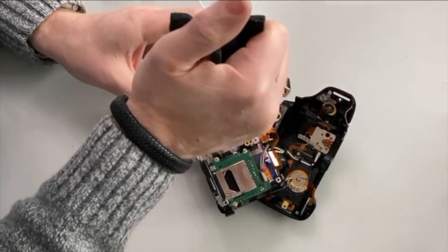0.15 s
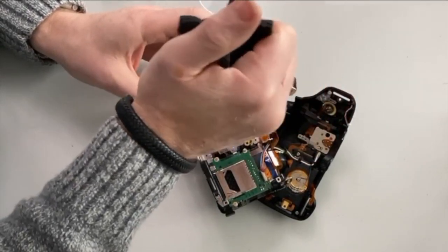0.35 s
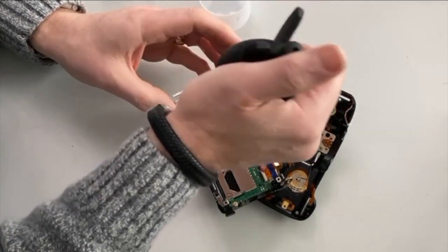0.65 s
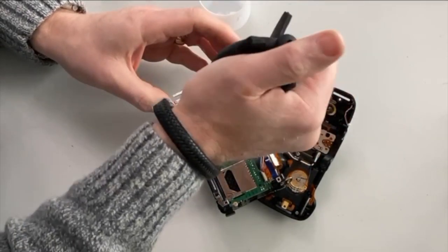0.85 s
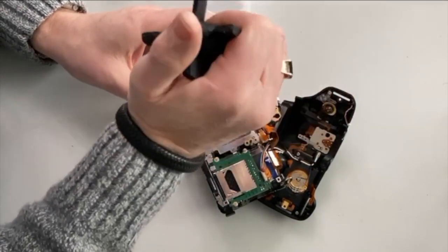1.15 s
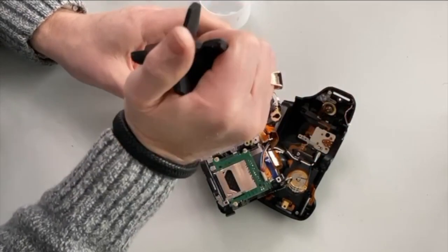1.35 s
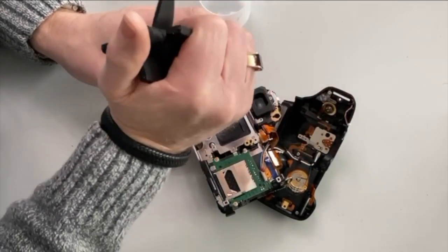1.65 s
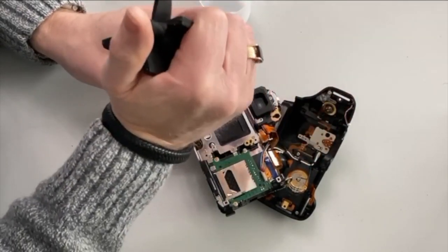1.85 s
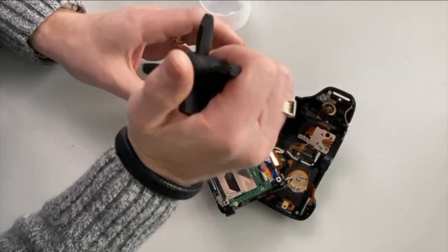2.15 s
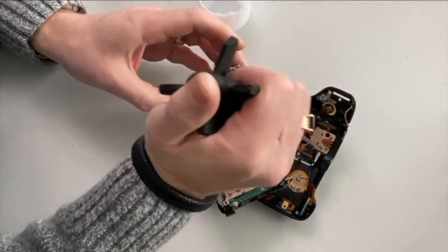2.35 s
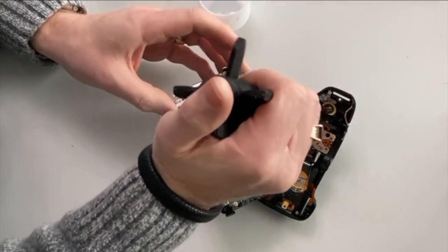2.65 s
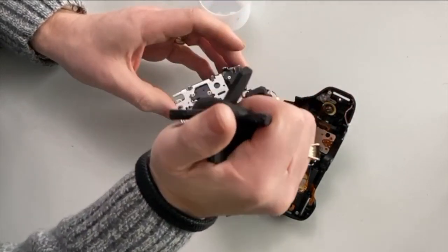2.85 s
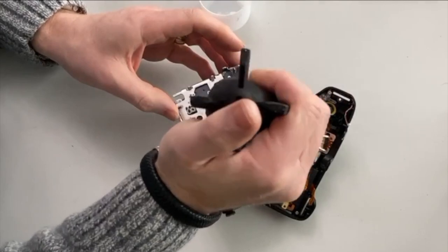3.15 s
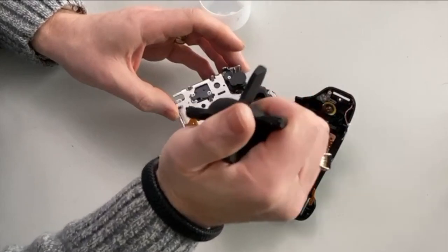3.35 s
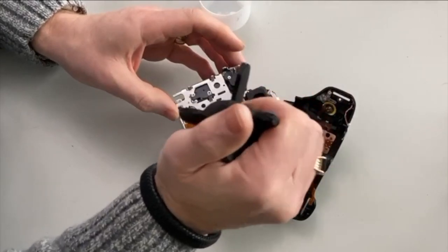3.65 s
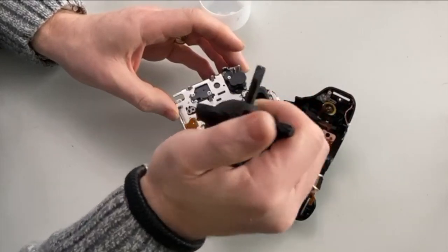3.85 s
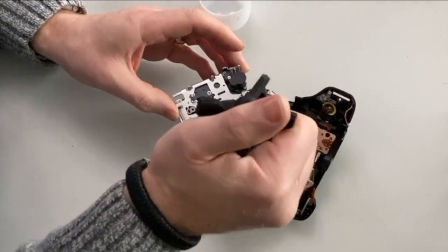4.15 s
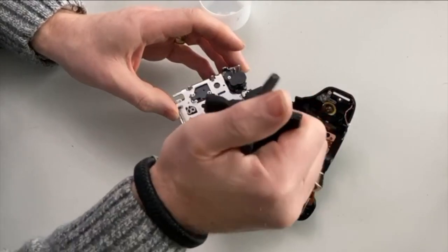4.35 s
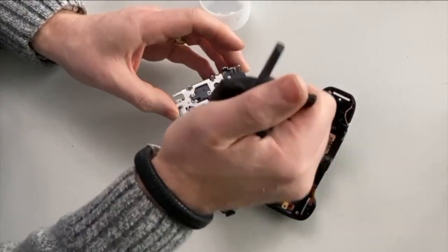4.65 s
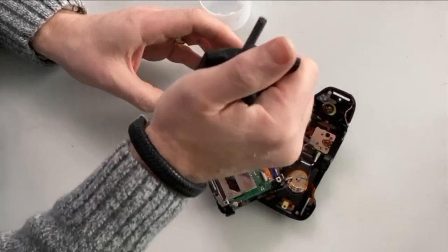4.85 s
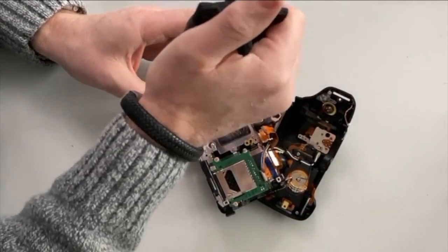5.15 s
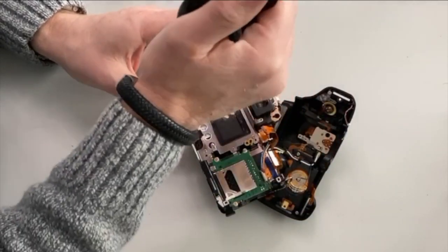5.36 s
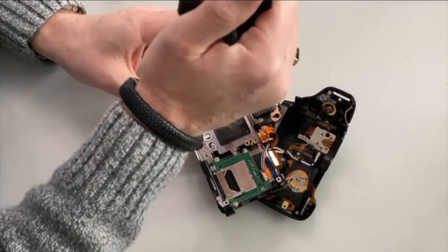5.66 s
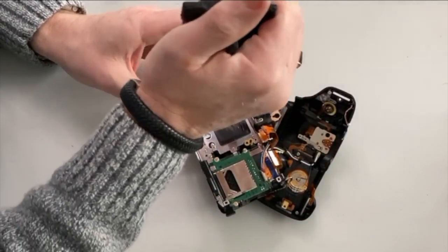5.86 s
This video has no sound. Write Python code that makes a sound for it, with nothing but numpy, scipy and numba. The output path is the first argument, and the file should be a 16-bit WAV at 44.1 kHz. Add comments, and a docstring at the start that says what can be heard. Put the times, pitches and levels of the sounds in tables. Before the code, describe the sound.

Close to one microphone in a small quiet room, a hand pumps a rubber bulb blower over a dismantled camera about four times a second. Each squeeze gives a short bright hiss; each release follows at once with a thinner intake and tiny high chirps. A ringing tap comes near the first second, soft thuds around four, light clicks after.

```python
"""On a desk in a small quiet room, a hand pumps a rubber bulb blower about four times a second.
Each squeeze sends a hissing jet onto small electronics: noise in resonances of their hollows and edges.
Each release draws air back through the rear valve: thinner noise, with gliding tones for its whistles.
Taps and dull thuds are fading tones; rumble and faint hiss lie below. One microphone listens close by."""
import sys
import numpy as np
from scipy import signal
from scipy.io import wavfile
from scipy.ndimage import uniform_filter1d
from numba import njit

SR = 44100
rng = np.random.default_rng(int(sys.argv[2]) if len(sys.argv) > 2 else 0)


def put_to_file(sound):
    """Save the sound as 16-bit audio at rate SR, in the file named by the first command-line argument."""
    columns = np.atleast_2d(sound).T  # one column per channel
    safe = np.clip(columns, -1, 1)
    whole_steps = np.round(safe * 32767)
    wavfile.write(sys.argv[1], SR, whole_steps.astype(np.int16))


N = 264159  # length in samples
SILENT_DB = -55.5  # level at which a squeeze or release starts and ends


def undb(db):
    """Turn a level in dB into a gain."""
    return 10 ** (np.asarray(db) / 20)


def unit(x):
    """Scale to an average (rms) level of 1."""
    return x / np.sqrt(np.mean(x ** 2))


@njit
def resonance(x, hz, width, bend):
    """Let through the tones near hz, with gain 1 at the centre; bend moves the centre sample by sample."""
    y, band, low = np.empty(len(x)), 0., 0.
    g0, k = np.tan(np.pi * hz / SR), width / hz
    for i in range(len(x)):
        g = g0 * bend[i]
        v = (band + g * (x[i] - low)) / (1 + g * (g + k))
        band = 2 * v - band
        low += 2 * g * v
        y[i] = k * v
    return y


def walk(rate_hz):
    """Random curve that slides to a new value rate_hz times a second; rms 1."""
    hold = int(SR / rate_hz)
    steps = np.repeat(rng.standard_normal(N // hold + 1), hold)
    return unit(uniform_filter1d(steps, hold)[:N])


def turbulence(modes, gust_db, pitch, wander=0.017, patchy_db=0.):
    """Noise in resonances whose pitches wander and whose levels flutter on top of a shared gust."""
    out = 0
    for hz, width, db in modes:
        bend = pitch * (1 + wander * walk(30))
        band = rng.standard_normal(N)
        for _ in range(2):  # two passes steepen the sides; 1.61 makes up for the narrowing
            band = resonance(band, 1. * hz, 1.61 * width, bend)
        flutter_db = 1.65 * walk(60) + patchy_db * walk(14)
        out = out + undb(db + flutter_db) * unit(band)
    return unit(out * undb(gust_db))


def stroke(start_s, full_ms, full_db, ease_ms, ease_db, length_ms, onset_ms, fall_curve, dip_db=0.):
    """One hand movement: its samples, progress 0-1 and gain, which rises, holds (maybe dips) and falls."""
    span = np.arange(max(int(start_s * SR), 0), min(int((start_s + length_ms / 1000) * SR), N))
    ms = 1000 * (span / SR - start_s)

    def ramp(a, b):
        return np.clip((ms - a) / max(b - a, 1), 0, 1)

    hold = ramp(full_ms, ease_ms)
    db = full_db + (ease_db - full_db) * hold + dip_db * np.sin(np.pi * hold) ** 2
    # a rise longer than onset_ms starts as steeply as one of that length
    db += (SILENT_DB - full_db) * (1 - ramp(0, full_ms)) ** max(full_ms / onset_ms, 1)
    # fall_curve 1 is straight in dB; more falls later
    db += (SILENT_DB - ease_db) * ramp(ease_ms, length_ms) ** fall_curve
    return span, np.clip(ms / length_ms, 0, 1), undb(db)


# Faint background hiss, strength along the pitch scale: pitch_hz [Hz], relative level_db [dB per Hz]
HISS_SPECTRUM = [(20, -1), (70, -12), (150, -10), (400, -16), (600, -11), (900, -15.5), (2000, -17),
                 (4000, -17.5), (8000, -13), (14000, -23.5)]
# Building rumble, played 3 % lower: pitch_hz [Hz], width_hz [Hz], relative level_db [dB]
RUMBLE_MODES = [(30.2, 9.1, 2.5), (47.5, 15.7, 2.5)]
HISS_DB, RUMBLE_DB = -53, -60.5


def floor():
    """Building rumble and faint hiss: noise in bands that waver slowly."""
    hz, db = np.transpose(HISS_SPECTRUM)
    centres = 20 * 2 ** np.arange(1.4, 9.6, .6)
    # a wider band holds more power
    levels = np.interp(np.log(centres), np.log(hz), db) + 10 * np.log10(centres)
    hiss = turbulence(zip(centres, centres / 3, levels), walk(3.1), pitch=0.97)
    rumble = turbulence(RUMBLE_MODES, walk(6.1), pitch=0.97)
    return undb(HISS_DB) * hiss + undb(RUMBLE_DB) * rumble


@njit
def walls(x, lags, gain, damp):
    """Room echo: eight delay lines that feed each other, duller on every round."""
    line, soft, out = np.zeros((8, 4096)), np.zeros(8), np.zeros(len(x))
    for i in range(len(x)):
        total = 0.
        for k in range(8):
            soft[k] += (1 - damp) * (gain[k] * line[k, (i - lags[k]) & 4095] - soft[k])
            total += soft[k]
        out[i] = soft[0] - soft[3] + soft[5] - soft[6]
        for k in range(8):
            line[k, i & 4095] = x[i] + soft[k] - total / 4
    return out


def room_answer(near):
    """Echoes of the near sounds; the low tones fade by 60 dB in 0.47 s and the treble sooner."""
    lags = np.array([467, 613, 797, 1013, 1231, 1493, 1759, 2039])  # samples
    gain = undb(-60 * lags / SR / 0.47)
    return undb(-16.5) * walls(near, lags, gain, 0.38)


def hits(events, modes, push_s):
    """Tones that fade after each blow; a softer contact pushes longer, so they set in more gently."""
    out, s = np.zeros(N + SR), np.arange(SR // 5) / SR
    ring = 0
    for hz, db, fade_s in modes:  # fade_s is the time to drop by 60 dB
        ring = ring + undb(db) * np.sin(2 * np.pi * hz * s) * np.exp(-np.log(1000) * s / fade_s)
    ring = ring * (1 - np.exp(-s / push_s))
    for start_s, peak_db in events:
        at = int(start_s * SR)
        out[at:at + len(s)] += undb(peak_db) * ring / np.max(ring)
    return out[:N]


# Dull thuds of hand and rubber: start_s [s], peak_db [dB]
THUDS = [(.105, -40), (3.02, -46.5), (4.201, -38), (4.229, -50), (4.328, -45), (4.478, -36.5)]
# Tones of a thud: pitch_hz [Hz], relative level_db [dB], fade_s [s for 60 dB]
THUD_MODES = [(144, 0, 0.049), (200, -2, 0.054)]


def thuds():
    """Hand and rubber knock softly: low tones that die quickly."""
    return hits(THUDS, THUD_MODES, 0.0011)


# The nozzle taps a part: start_s [s], ring_peak_db [dB], tick_peak_db [dB]
NOZZLE_TAPS = [(.916, -17, -29), (4.912, -36, -23), (5.588, -28.5, -23.5)]
# Ringing tones of a tap: pitch_hz [Hz], relative level_db [dB], fade_s [s for 60 dB]
RING_MODES = [(840, -17.5, 0.057), (2026, 2, 0.021), (2590, -1, 0.065)]
# Short tick of a tap: pitch_hz [Hz], relative level_db [dB], fade_s [s for 60 dB]
SHORT_TICK_MODES = [(925, -7.5, 0.0064), (1910, -1, 0.0054), (3650, 1, 0.0063), (5400, 5, 0.0039)]


def taps():
    """The nozzle touches a part: a hard, very short tick and a longer ring."""
    rings = [(start_s, ring_db) for start_s, ring_db, _ in NOZZLE_TAPS]
    ticks = [(start_s, tick_db) for start_s, _, tick_db in NOZZLE_TAPS]
    return hits(rings, RING_MODES, 0.0017) + hits(ticks, SHORT_TICK_MODES, 0.00017)


# Releases, when the bulb refills: start_s [s], full_ms [ms], full_db [dB],
# ease_ms (valve begins to shut) [ms], ease_db [dB], length_ms [ms],
# opening_whistle_db, closing_whistle_db, high_whistle_db [dB; about -60 is practically none]
RELEASES = [(0.026, 78, -30, 82, -34, 110, -60, -60, -60), (0.241, 63, -30.5, 86, -34.5, 98, -60, -60, -60),
            (0.487, 65, -32, 87, -32.5, 120, -39, -33.5, -60),
            (0.733, 72, -31, 88, -28.5, 126, -60, -60, -60),
            (1.033, 32, -30.5, 82, -30, 115, -60, -60, -39), (1.3, 35, -32, 71, -31.5, 100, -27, -38, -35),
            (1.548, 25, -37, 52, -34.5, 85, -39, -39, -60),
            (1.754, 48, -33.5, 79, -35, 86, -26.5, -34, -60), (2.032, 39, -33, 66, -28, 105, -31, -60, -39),
            (2.288, 60, -31, 80, -33.5, 113, -32.5, -33, -31.5),
            (2.528, 74, -33.5, 86, -34, 104, -33, -25, -60),
            (2.802, 26, -32.5, 71, -30.5, 108, -60, -32.5, -60),
            (3.022, 56, -29.5, 84, -36, 103, -33, -38, -60),
            (3.252, 42, -29.5, 64, -32.5, 95, -61, -60, -60),
            (3.468, 31, -30.5, 80, -31.5, 120, -60, -60, -34), (3.699, 40, -31, 75, -34, 85, -29, -35, -60),
            (3.918, 49, -30.5, 68, -33, 90, -60, -60, -60), (4.117, 55, -30, 86, -34.5, 112, -60, -60, -60),
            (4.344, 48, -30, 62.5, -35, 79, -60, -28.5, -60),
            (4.536, 42, -28.5, 76, -30, 97, -60, -60, -60), (4.777, 48, -31.5, 60, -30, 97, -60, -60, -60),
            (4.991, 63, -31.5, 77, -35, 97, -40, -36, -39),
            (5.242, 69, -32, 82, -29.5, 106, -32.5, -35, -39),
            (5.466, 35, -33.5, 65, -30.5, 99, -28, -60, -35.5),
            (5.686, 43, -32, 64, -33, 88, -38, -60, -60), (5.885, 43, -31, 67, -32, 96, -60, -60, -60)]
# Valve chamber, pitches bent by the inflow: pitch_hz [Hz], width_hz [Hz], relative level_db [dB]
CHAMBER_MODES = [(7585, 290, -1.5), (7740, 660, -1.5), (8370, 350, -0.13)]
# Air path of the valve, bent likewise: pitch_hz [Hz], width_hz [Hz], relative level_db [dB]
PATH_MODES = [(1486, 500, -13), (2030, 330, -13), (2550, 320, -14.5), (3600, 610, -9), (5820, 840, -3),
              (6100, 380, -1.5), (6810, 750, -2), (9200, 130, -3), (9770, 2500, -1), (11470, 110, -7),
              (11230, 3000, -10.5), (13780, 4000, -4.5)]
CHAMBER_DB, WALL_DB = -3.5, -24.5  # chamber and rubber wall beside the inflow hiss


def refill():
    """Air rushes in through the valve while the rubber wall flutters back into shape."""
    strokes = [stroke(*row[:6], onset_ms=19.2, fall_curve=1.03) for row in RELEASES]
    bend = np.ones(N)
    for span, progress, _ in strokes:  # faster inflow lifts the valve resonances a little
        bend[span] = 1 + 0.036 * (np.sin(np.pi * progress) - .7)
    gust_db = walk(200)
    chamber = turbulence(CHAMBER_MODES, gust_db, bend, wander=0.026)
    path = turbulence(PATH_MODES, gust_db, bend, wander=0.0037, patchy_db=0.5)
    # pitch Hz, width Hz, dB; played 3 % lower
    wall = turbulence([(162, 83, -3.5), (320, 600, 0.0)], 0.97 * walk(40), pitch=0.97)
    share = undb(CHAMBER_DB)
    hiss = share * chamber + np.sqrt(1 - share ** 2) * path
    out = np.zeros(N)
    for row, (span, progress, gain) in zip(RELEASES, strokes):
        out[span] += gain * hiss[span]
        out[span] += undb(row[2] + WALL_DB) * np.sin(np.pi * progress ** 1.55) * wall[span]
    return out


# Timed chirps of the refill, mostly near 7-8.7 kHz:
# start_s [s], length_ms [ms], start_pitch_hz [Hz], end_pitch_hz [Hz], level_db [dB]
TIMED_CHIRPS = [(0.067, 41, 7630, 8060, -36), (0.278, 17, 8200, 8700, -26), (0.283, 54, 7560, 7650, -33),
                (0.521, 21, 7540, 7910, -35), (0.554, 13, 8700, 8400, -32.7), (0.786, 13, 7820, 8150, -34),
                (1.064, 17, 7350, 7770, -35), (1.348, 19, 7840, 7650, -32), (2.079, 22, 8000, 7760, -32),
                (2.341, 35, 7900, 7630, -30.5), (2.565, 26, 8140, 8350, -33.6),
                (2.832, 15, 8000, 8330, -31.4), (2.841, 24, 7460, 8000, -24.5),
                (3.066, 52, 7880, 7740, -26.5), (3.298, 25, 7530, 7450, -31.5),
                (3.493, 14, 8200, 8200, -31.8), (3.51, 18, 8100, 8510, -25), (3.735, 21, 8080, 8400, -29),
                (3.957, 27, 7240, 7940, -25), (4.17, 25, 7530, 7540, -24.5), (4.573, 17, 7920, 8740, -28),
                (4.588, 14, 7730, 7100, -32), (4.636, 22, 9700, 9800, -34.6), (5.036, 35, 7470, 7800, -30),
                (5.289, 17, 7630, 8030, -26.5), (5.297, 19, 8170, 8470, -28.5),
                (5.503, 57, 8360, 7220, -30.5), (5.72, 32, 7290, 7600, -36), (5.925, 60, 7560, 7600, -35)]
# Whistle shapes: ms to loudest, length ms, start Hz, end Hz
OPENING_WHISTLE = (22, 42, 9130, 9400)
CLOSING_WHISTLE = (10, 26, 9500, 9080)
HIGH_WHISTLE = (25.9, 51.5, 11400, 11400)
OPENING_LOUDEST_MS = 33  # after the release starts; the other two peak as the valve begins to shut
# one chirp at a chance moment of each release: level, length, usual pitch and its spread
CHANCE_DB, CHANCE_MS, CHANCE_HZ, CHANCE_SPREAD_HZ = -35.5, 15, 7800, 366


def whistles():
    """The inflow locks to a valve resonance for a moment: a wavering tone that glides with the flow."""
    tones = [(start_s, 0.45 * ms, ms, hz0, hz1, db) for start_s, ms, hz0, hz1, db in TIMED_CHIRPS]
    shapes = (OPENING_WHISTLE, CLOSING_WHISTLE, HIGH_WHISTLE)
    for row in RELEASES:
        release_s, ease_ms = row[0], row[3]
        for loudest, shape, db in zip((OPENING_LOUDEST_MS, ease_ms, ease_ms), shapes, row[6:9]):
            tones.append((release_s + (loudest - shape[0]) / 1000, *shape, db))
        # the chance chirp starts before the valve begins to shut
        start_s = release_s + (0.23 + 0.67 * rng.random()) * ease_ms * 0.00092
        hz = CHANCE_HZ + CHANCE_SPREAD_HZ * rng.standard_normal()
        glide_hz = CHANCE_SPREAD_HZ * rng.standard_normal() / 2
        tones.append((start_s, CHANCE_MS / 2, CHANCE_MS, hz, hz + glide_hz, CHANCE_DB))
    out, waver, tremble = np.zeros(N), 1 + 0.0033 * walk(250), undb(1.54 * walk(180))
    for start_s, loudest_ms, length_ms, hz0, hz1, db in tones:
        span = np.arange(int(start_s * SR), min(int((start_s + length_ms / 1000) * SR), N))
        ms = 1000 * (span / SR - start_s)
        rise_fall = np.interp(ms, [0, min(loudest_ms, length_ms), length_ms], [0, 1, 0])
        swell = np.sin(np.pi / 2 * rise_fall) ** 2.4
        hz = np.interp(ms, [0, length_ms], [hz0, hz1]) * waver[span]
        tone = np.sin(2 * np.pi * np.cumsum(hz) / SR)
        out[span] += np.sqrt(2) * undb(db) * swell * tremble[span] * tone
    return out


# Squeezes: start_s [s], full_ms [ms], full_db [dB], ease_ms (grip eases) [ms], ease_db [dB],
# dip_db (added midway) [dB], length_ms [ms], then levels beside the hiss, before drift and slower growth:
# deep_hollow_db, hollow_db, gap_db, edge_db, tip_db, top_db [dB];
# drift_db (half the hollows' change over the squeeze) [dB], hollow_pitch, nozzle_pitch [factors]
SQUEEZES = [(-0.027, 27, -30, 45, -41, 0, 73, -36, -18, -20.5, -12, -6.5, -9, 5, 1.07, 0.88),
            (0.124, 25.4, -24, 85, -30.5, 0.5, 132, -25, -16.5, -14, -9.5, -6.5, -6, -7, 1.01, 0.95),
            (0.357, 52, -26.5, 105, -32, 0, 137, -20.5, -11.5, -17, -7, -8.5, -8, -6.5, 1.09, 0.91),
            (0.592, 49, -26.5, 81, -25, -4, 165, -20.5, -9, -13.5, -5, -7, -9, -2, 1.045, 0.95),
            (0.866, 36, -24.5, 107, -28, -9.5, 170, -17.5, -10.5, -13, -9, -14.5, -13, 4.5, 0.93, 0.93),
            (1.142, 16, -27.5, 97, -27, 0.5, 152, -21, -13.5, -14, -12, -12.5, -13, -6, .93, 0.99),
            (1.4, 34, -22, 99, -29, -4, 133, -35, -16.5, -21, -10, -13, -14, -13.5, 0.98, 1.02),
            (1.635, 14, -33, 93, -33, 0, 109, -25.5, -9.5, -18, -6.5, -8, -8.5, -1.5, 0.96, 1.01),
            (1.85, 27, -29.5, 150, -35, -2.5, 168, -15.5, -12, -16.4, -7.5, -16, -15, 4.5, 0.93, 0.97),
            (2.128, 28, -27, 95, -29, 3.5, 160, -29, -11, -16, -5, -13, -10.5, -7, .99, 1.007),
            (2.396, 24.6, -21.5, 70, -29.5, -1, 125, -21, -1, -12.5, -5.5, -10.5, -12, 9, 1.055, 1),
            (2.658, 30, -25.5, 110, -32.5, -1, 147.5, -26, -7.5, -13.5, -5, -12, -11, 1, 0.97, 0.99),
            (2.894, 27, -27, 96.2, -31, 0, 142, -30, -7, -7.5, -3.5, -11.8, -13, 1.5, 0.97, 1),
            (3.12, 16.4, -30.5, 103, -30, 2, 142, -30, -10.5, -15, -5, -17, -8.5, -9.5, 0.98, 1.05),
            (3.336, 21.7, -25, 111.5, -31.5, 1, 138, -33, -13.5, -16, -6, -8, -9, 1, 1.01, 1.05),
            (3.571, 24, -24, 61, -26.5, 0, 133, -23, -10.5, -12, -6.5, -14, -10, 18, 0.98, 1.05),
            (3.788, 46, -26, 96, -27, -6, 137, -24.5, -9, -13, -7, -4.5, -8.5, 3.5, 0.99, 0.88),
            (4.002, 18.4, -27, 90, -29, -1.5, 136, -34, -16.5, -19, -8.5, -5, -7, -5.5, 0.954, 1.001),
            (4.217, 28, -27, 94, -28, -4, 136, -25.5, -9.5, -14, -9, -5, -5, 3.5, 1.03, 0.92),
            (4.412, 31, -27, 83, -30, 0, 127, -20.5, -8.5, -16, -7, -6, -9, 10.5, 1, 0.94),
            (4.618, 70, -24.5, 92, -22.5, -9.5, 159, -34.3, -16.5, -18, -5.5, -9, -12, -2, .98, 1),
            (4.864, 37, -26, 87, -28.5, 2, 142, -21, -11, -13.5, -6.5, -7, -9, -9, 1.06, 0.91),
            (5.107, 36, -29, 96, -28.5, 2, 151, -23.5, -10.5, -13, -5.5, -7, -10.5, 0.5, 1.02, .96),
            (5.347, 36, -23.5, 70.4, -29, 0.5, 133, -24.5, -10.5, -11, -4.5, -7.5, -12, -0.5, 1.04, 0.97),
            (5.559, 38, -23, 68, -30.5, -2, 150, -28.5, -11.5, -10.5, -6, -13, -13, -1, 0.92, 1.01),
            (5.767, 37, -28.5, 65, -32, 1.5, 108, -12.5, -7, -10, -5.5, -9, -12, 7, 1, 0.91),
            (5.955, 30, -44, 60, -42, 0, 100, -25, -11, -17, -7, -9, -10, 2, 1.001, 1.001)]
# What the jet blows over, each table: pitch_hz [Hz], width_hz [Hz], relative level_db [dB]
# Deep hollow: pitch_hz [Hz], width_hz [Hz], level_db [dB]
DEEP_HOLLOW_MODES = [(834, 93, -5.5), (954, 900, -0.5)]
# Hollow, moved by hollow_pitch: pitch_hz [Hz], width_hz [Hz], level_db [dB]
HOLLOW_MODES = [(1316, 245, -6), (1550, 220, -1), (1758, 140, 1), (2030, 230, 3.5), (2266, 130, -6.5),
                (2533, 320, -3.5)]
# Gap: pitch_hz [Hz], width_hz [Hz], level_db [dB]
GAP_MODES = [(3540, 1170, -3.5), (4185, 930, 0.8)]
# Edge: pitch_hz [Hz], width_hz [Hz], level_db [dB]
EDGE_MODES = [(5040, 720, -3), (5680, 440, -1), (6256, 500, 0)]
# Tip, moved by nozzle_pitch: pitch_hz [Hz], width_hz [Hz], level_db [dB]
TIP_MODES = [(10280, 1100, -3.5), (11430, 1400, -1.5)]
# Top treble: pitch_hz [Hz], width_hz [Hz], level_db [dB]
TOP_MODES = [(12470, 1600, 1.5), (13870, 970, 2.5), (14900, 1200, -3.5)]
# The nozzle's own hiss, moved by nozzle_pitch: pitch_hz [Hz], width_hz [Hz], level_db [dB]
NOZZLE_MODES = [(8250, 2600, -3), (8490, 1020, -0.5), (9540, 1570, -0.2)]
EDGE_DRIFT_SHARE = 0.53  # gap and edge drift less than the hollows


def jet():
    """Each squeeze excites the same resonances, in shares and at pitches set by where the nozzle points."""
    gust_db = 0.47 * walk(150) + walk(500)
    squeeze = np.searchsorted([row[0] for row in SQUEEZES[1:]], np.arange(N) / SR)
    hollow_pitch, nozzle_pitch = np.array([row[14:16] for row in SQUEEZES]).T[:, squeeze]
    groups = [(DEEP_HOLLOW_MODES, 1.), (HOLLOW_MODES, hollow_pitch), (GAP_MODES, 1.), (EDGE_MODES, 1.),
              (TIP_MODES, nozzle_pitch), (TOP_MODES, 1.), (NOZZLE_MODES, nozzle_pitch)]
    parts = np.array([turbulence(modes, gust_db, pitch, wander=0.016, patchy_db=2.0)
                      for modes, pitch in groups])
    out = np.zeros(N)
    for row in SQUEEZES:
        dip_db, length_ms, drift_db = row[5], row[6], row[13]
        span, progress, gain = stroke(*row[:5], length_ms, onset_ms=22.2, fall_curve=1.13, dip_db=dip_db)
        shares = undb(row[7:13])
        # the nozzle's own hiss carries the treble power that the struck parts do not
        own = np.sqrt(max(1 - np.sum(shares[2:] ** 2), .05))
        # hollows grow more slowly with jet speed than the hiss, so they start earlier and last longer
        steadier = (gain.max() * undb(-5) / gain) ** 0.21 * np.sin(np.pi * progress) ** 0.21
        hollow_drift = undb(2 * drift_db * (progress - 0.4562))
        edge_drift = undb(2 * EDGE_DRIFT_SHARE * drift_db * (progress - 0.5))
        hollows = shares[:2] @ parts[:2, span] * steadier * hollow_drift
        edges = shares[2:4] @ parts[2:4, span] * edge_drift
        treble = shares[4:] @ parts[4:6, span] + own * parts[6, span]
        out[span] += gain * (hollows + edges + treble)
    return out


# Pitches partly cancelled by the desk echo: pitch_hz [Hz], width_hz [Hz], depth [0-1]
ECHO_NOTCHES = [(2970, 650, 0.22), (6700, 1400, 0.11)]


def scene():
    """Blower and hits with the room's answer, over the floor, thinned by the desk echo."""
    near = thuds() + taps() + refill() + whistles() + jet()
    heard = floor() + room_answer(near) + near
    for hz, width, depth in ECHO_NOTCHES:
        heard = heard - depth * resonance(heard, 1. * hz, 1. * width, np.ones(N))
    return np.tile(heard, (2, 1))  # the same sound left and right


@njit
def follow(x, attack, release):
    """Loudness curve that rises fast and falls slowly."""
    level, out = 0., np.empty(len(x))
    for i in range(len(x)):
        level += (abs(x[i]) - level) * (attack if abs(x[i]) > level else release)
        out[i] = level
    return out


def record(dry):
    """A suppressor turns the bass down while loud hiss passes and lets it back slowly; the top is cut."""
    bass = signal.sosfiltfilt(signal.butter(2, 450, fs=SR, output="sos"), dry)
    hiss = resonance(dry[0], 6300.0, 11000.0, np.ones(N))
    loud = follow(hiss, 1 / (0.0063 * SR), 1 / (.07 * SR))  # rises in 6.3 ms, falls in 70 ms
    duck = np.minimum(undb(-28.5) / (loud + 1e-9), 1) ** 2.5
    top_cut = signal.ellip(12, .2, 60, 15770, fs=SR, output="sos")
    return signal.sosfilt(top_cut, dry - (1 - duck) * bass)


dry = scene()
out = record(dry)
put_to_file(out)
```